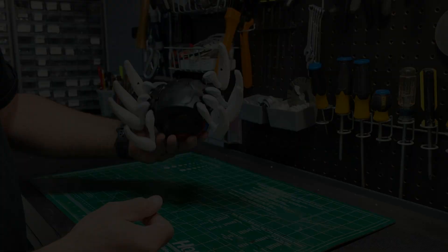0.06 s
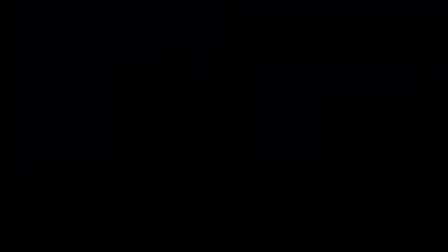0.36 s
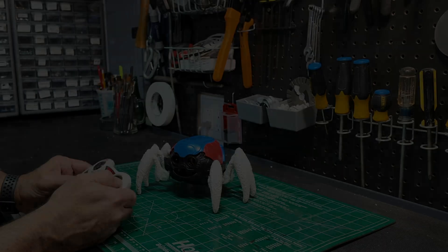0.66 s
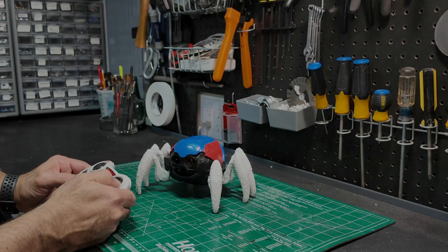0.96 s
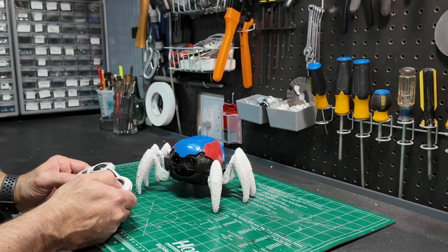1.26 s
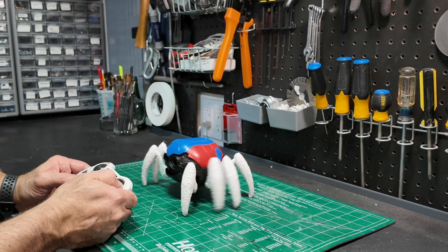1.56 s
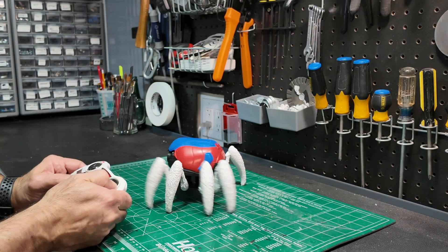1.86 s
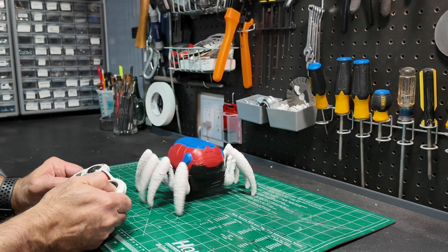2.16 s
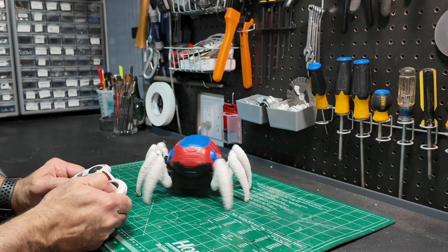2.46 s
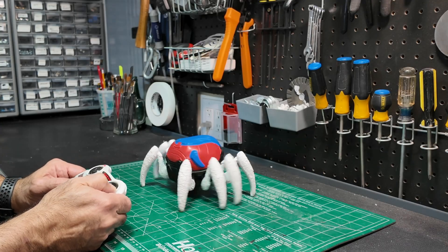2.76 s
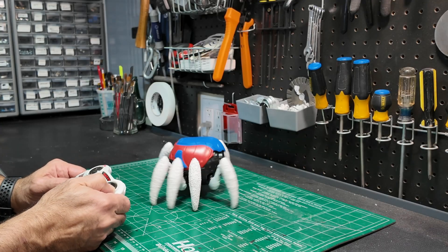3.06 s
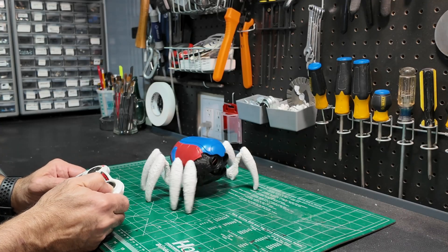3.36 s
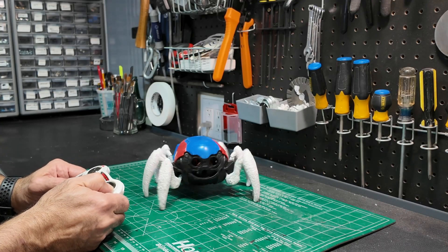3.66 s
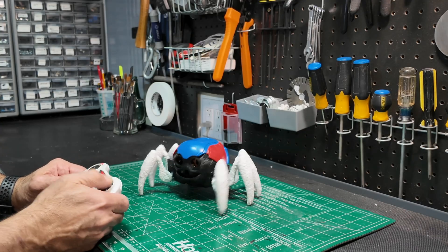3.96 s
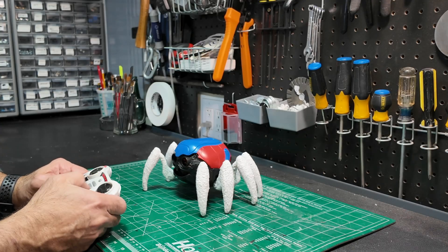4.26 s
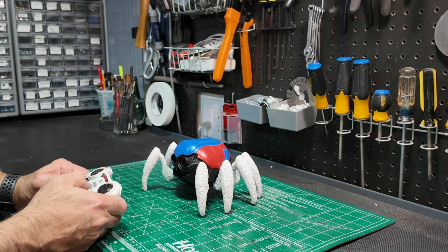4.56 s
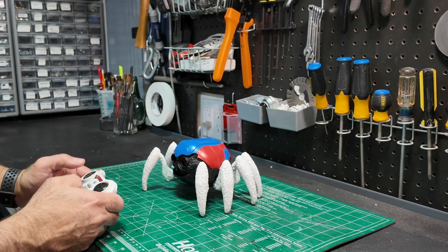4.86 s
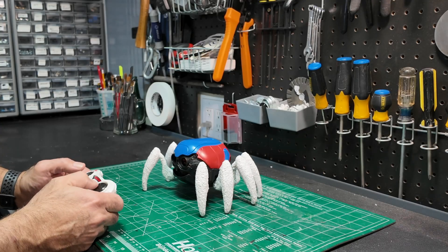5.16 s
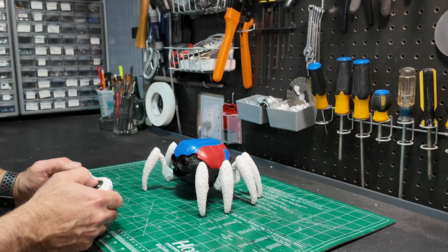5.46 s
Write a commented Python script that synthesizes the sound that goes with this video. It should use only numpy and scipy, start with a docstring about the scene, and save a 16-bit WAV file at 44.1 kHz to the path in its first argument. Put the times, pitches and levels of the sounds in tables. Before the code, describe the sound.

A remote-controlled toy's geared motor whines and its plastic legs clatter on a workbench, then stop, with faint button clicks before and after.

```python
"""A small workshop opens on quiet air and mains hum; buttons click on a controller.
At 1.4 s a remote-controlled toy spider starts turning on the spot on a workbench mat.
Its plastic gears whirr, chatter in the hollow shell and groan under each footfall; the legs clack,
the bench booms. Near 4.4 s the gears stop and the motor coasts to rest.
Last, the buttons click again and the hands shift on the bench."""
import sys
import numpy as np
from scipy import signal
from scipy.fft import rfft, irfft
from scipy.io import wavfile
from scipy.ndimage import uniform_filter1d

SR = 44100
rng = np.random.default_rng(int(sys.argv[2]) if len(sys.argv) > 2 else 0)


def int16_out(signal):
    """Quantize to a 16-bit WAV file."""
    q = np.round(np.clip(np.atleast_2d(signal).T, -1, 1) * 32767)
    wavfile.write(sys.argv[1], SR, q.astype(np.int16))


N = 248142
TIME_S = np.arange(N) / SR

# Spectral outlines. Each row: frequency in Hz, relative level in dB.
AIR_HZ_DB = [(15, -50), (25, -22.5), (55, -6.5), (122, -5.5), (188, -16.5), (253, -11), (340, -17.5),
             (666, -24), (1050, -27.5), (1340, -28), (1450, -34.5), (2170, -30.5), (4500, -37),
             (8580, -39.5), (15500, -45.5)]
BUTTON_BODY_HZ_DB = [(300, -27), (700, -11.5), (1020, 3.5), (1350, -2.5), (1700, -1), (2400, -2.5),
                     (4000, -49)]
BUTTON_RING_HZ_DB = [(1200, -27.5), (2150, -15.5), (2450, -4), (2850, 8.5), (3200, 4), (3700, -10),
                     (5000, -30)]
BUTTON_SNAP_HZ_DB = [(2000, -8), (3900, 4), (5000, 1.5), (6800, -2.5), (9000, -13), (15000, -27)]
TAP_HZ_DB = [(400, -33), (800, -10), (1080, 7.5), (1400, -8), (2800, -6), (6000, -30)]
WRIST_HZ_DB = [(100, -9), (220, -4), (400, 4), (600, -7), (800, -16), (1500, -40)]
RUB_HZ_DB = [(200, 5), (600, 5.5), (1100, -2), (1800, -1.5), (2800, -0.5), (4500, -7.5), (7000, -4.5),
             (10000, -14), (15000, -29)]
BUMP_HZ_DB = [(25, -24), (60, -13), (90, 10), (130, 1), (200, -16.5), (450, -25), (900, -67)]
THUD_HZ_DB = [(50, -27.5), (150, -7), (230, -10), (320, -0.5), (380, -7.5), (440, 1), (520, -4.5), (630, 0),
              (800, -7), (1100, -5), (1500, -11), (3000, -40.5)]
CLACK_HZ_DB = [(500, -12.5), (1100, -6.5), (1700, 1), (2100, 2.5), (2700, 5), (3600, 0), (4500, -5),
               (7000, -31)]
TICK_HZ_DB = [(2500, -24.5), (4700, -0.5), (6700, 0.5), (8200, -9), (10000, -11), (12500, -25.5),
              (15500, -34.5)]
SCUFF_HZ_DB = [(24, -46), (40, -16.5), (70, -2), (102, -10), (124, 5), (209, -8), (316, -2), (378, -0.5),
               (439, 2.5), (509, -4), (618, -4), (750, -3), (951, -6), (1060, -2.5), (1400, -16),
               (1820, -39.5), (3080, -120)]
CHATTER_HZ_DB = [(500, -22), (900, -12.5), (1400, -3), (1850, -2.5), (2500, 0.5), (3300, -6.5),
                 (4000, -5.5), (5000, -27.5)]
CLASH_HZ_DB = [(2290, -39.5), (3900, 1), (4510, 0.5), (5090, 5), (5740, 3), (6520, 5), (7400, -3.5),
               (8070, -10.5), (9540, -7.5), (10500, -16.5), (11500, -13.5), (13100, -31.5), (15500, -46)]

# Electrical tones. Each row: frequency in Hz, wander in Hz, level in dB.
HUM_TONES = [(120.3, 3, -66.5), (5850, 250, -91), (8440, 120, -89)]
# Button clicks. Each row: start in seconds, then body, ring and snap levels in relative dB.
BUTTON_CLICKS = [(0.605, -47.5, -53.5, -58), (0.76, -53.5, -64, -62), (1.141, -41, -43, -72),
                 (1.183, -45.5, -53.5, -54), (4.897, -52, -49.5, -57), (5.294, -46, -52.5, -47.5),
                 (5.301, -37.5, -48, -47), (5.312, -50, -54, -61), (5.613, -38.5, -30.5, -40.5)]
# Fingers on the case; wrist on the bench. Each row: start in seconds, level in dB.
FINGER_TAPS_S_DB = [(0.86, -64), (0.947, -65.5), (4.752, -65), (4.92, -59), (4.929, -56), (5.09, -63),
                    (5.53, -47)]
WRIST_KNOCKS_S_DB = [(0.779, -57), (0.792, -60), (0.804, -58)]
# Fingers sliding; hand bumping the bench. Each row: centre in seconds, half length in seconds,
# level in dB.
FINGER_RUBS = [(.89, 0.033, -70), (1.37, 0.028, -68), (4.945, 0.041, -66), (5.345, 0.043, -59.5),
               (5.53, 0.06, -54.5)]
HAND_BUMPS = [(.812, .012, -55), (5.518, 0.012, -34), (5.578, 0.027, -40.5)]

# Footfalls, about ten a second. Each row: start in seconds, then thud, clack, tick, bench boom and
# gear groan levels in relative dB, then groan lag in seconds.
FOOTFALLS = [(1.537, -27.5, -44, -38, -33, -33.5, 0.07), (1.649, -26.5, -24, -27.5, -40, -29.5, 0.04),
             (1.73, -29, -28.5, -35.5, -35.5, -35, 0.065), (1.851, -25.5, -36, -34, -37, -30, .059),
             (1.945, -27.5, -32, -28.5, -39.5, -31.5, .06), (2.063, -25, -27, -24.5, -35.5, -25, 0.058),
             (2.178, -29, -26.5, -41, -39.5, -30.5, 0.055), (2.274, -23, -23, -26.5, -34, -25.5, .054),
             (2.39, -24.5, -39.5, -29, -38.5, -31, 0.044), (2.474, -30.5, -29, -27, -40, -31.5, .056),
             (2.56, -29, -23.5, -33, -36.5, -36.5, 0.066), (2.688, -26.5, -32, -26, -43, -35.5, .06),
             (2.768, -33, -28.5, -32, -45.5, -38, 0.056), (2.885, -34.5, -36.5, -33, -42, -36, .035),
             (2.986, -29.5, -35, -26.5, -34.5, -35, .035), (3.097, -26, -26, -46, -47.5, -33.5, .032),
             (3.2, -29, -30.5, -27.5, -47.5, -30.5, 0.036), (3.291, -27, -27.5, -31.5, -53, -28, .051),
             (3.401, -28.5, -31, -29.5, -40.5, -30.5, 0.051), (3.505, -20, -24, -25.5, -44, -28, 0.051),
             (3.584, -27.5, -24.5, -34.5, -40, -28, 0.08), (3.712, -24, -23, -35, -37.5, -28, 0.04),
             (3.791, -28, -23.5, -37.5, -32.5, -29, 0.087), (3.92, -25.5, -25.5, -23, -32.5, -26, 0.035),
             (4.019, -32, -40, -40.5, -33.5, -32.5, .062), (4.125, -20.5, -24, -22, -38.5, -28.5, .02),
             (4.221, -35.5, -45.5, -44, -39.5, -46, .05)]
# Loose joints hitting their stops. Each row: start in seconds, then thud, clack and tick levels
# in relative dB.
JOINT_KNOCKS = [(1.513, -34.5, -27.5, -47), (1.694, -25, -21.5, -26.5), (2.149, -27, -24, -31),
                (2.353, -29, -23.5, -32), (2.508, -31, -32, -33), (2.782, -28.5, -28.5, -27),
                (2.937, -27.5, -33.5, -34), (3.007, -33, -29.5, -30), (3.298, -28.5, -24.5, -30.5),
                (3.43, -35.5, -25.5, -43), (3.628, -29.5, -33.5, -32.5), (3.839, -31, -29.5, -33.5),
                (3.954, -24, -19, -25), (4.146, -42.5, -21.5, -29.5), (4.159, -28.5, -21, -22.5)]
# Dry joints squeaking; gears taking up slack on start and braking. Each row: centre in seconds,
# half length in seconds, pitch in Hz, relative level in dB.
JOINT_SQUEAKS = [(2.064, 0.0061, 10300, -45), (2.135, 0.019, 13900, -58), (2.53, 0.014, 3530, -35.5),
                 (2.77, .018, 7150, -38), (3.118, 0.014, 2290, -31), (3.405, .01, 13060, -59),
                 (3.61, 0.0091, 9860, -40.5), (3.83, .025, 5560, -34), (3.9, 0.047, 5120, -37),
                 (3.96, 0.013, 4730, -36.5)]
SLACK_JOLTS = [(1.443, 0.011, 2484, -32), (4.31, .025, 2415, -38)]

# Freewheeling rotor. Each row: time in seconds, whistle pitch in Hz, relative level in dB.
ROTOR_S_HZ_DB = [(4.42, 8150, -80), (4.45, 8200, -73), (4.49, 7570, -70), (4.53, 7100, -75),
                 (4.58, 6020, -79.5), (4.62, 4960, -84)]
# Gear pairs; the slow one drives the legs. Each row: time in seconds, tooth rate in Hz,
# relative level in dB.
FIRST_MESH_S_HZ_DB = [(1.41, 1500, -60), (1.5, 2010, -38), (1.8, 2167, -38.5), (1.95, 2210, -33),
                      (2.2, 2253, -36), (2.7, 2242, -47), (3.1, 2259, -45), (3.7, 2264, -41.5),
                      (4.15, 2197, -44.5), (4.3, 1650, -50), (4.37, 1455, -37), (4.43, 1300, -66)]
SECOND_MESH_S_HZ_DB = [(1.5, 2610, -55.5), (1.7, 2990, -44), (1.92, 3113, -38), (2.08, 3290, -34),
                       (2.3, 3283, -37.5), (2.55, 3490, -45.5), (2.7, 3360, -46.5)]
SLOW_MESH_S_HZ_DB = [(1.85, 1633, -55), (2.0, 1657, -41.5), (2.25, 1654, -36), (2.55, 1662, -40),
                     (2.8, 1650, -59), (3.2, 1660, -43), (3.6, 1672, -40.5), (3.95, 1670, -40.5),
                     (4.1, 1645, -49)]
# Plastic shell resonances. Each row: centre in Hz, width in Hz, relative level in dB.
SHELL_MODES = [(1440, 250, -12.5), (1648, 78, -3.5), (2140, 300, -12), (2170, 140, -8.5), (2478, 130, -2.5),
               (2750, 94, -1.5), (3130, 380, -3), (3700, 220, -9.5)]
# Chatter at full speed. Each row: time in seconds, relative level in dB.
CHATTER_S_DB = [(1.5, -28.5), (2.25, -28), (2.7, -29.5), (3.2, -29.5), (3.6, -28.5), (4.3, -29.5)]

OPEN_S, TOP_HZ = 0.357, 15700
MOTOR_ON_S, GEARS_LOCK_S, FULL_SPEED_HZ = 1.421, 4.362, 2273
CHATTER_DB_PER_OCTAVE, CLASH_DB_PER_OCTAVE = 9, 23
LOAD_ATTACK_S, LOAD_HOLD_S, LOAD_RELEASE_S = 0.015, 0.05, 0.014
GROAN_HALF_S, GROAN_RATIO, GROAN_SCATTER = 0.019, 1.106, 0.012


def undb(db):
    """Decibels to gain."""
    return 10 ** (np.asarray(db) / 20)


def unit(x):
    """Scale to rms 1."""
    return x / np.sqrt(np.mean(x ** 2))


def phase_rad(hz):
    """Running phase of a varying frequency."""
    return 2 * np.pi * np.cumsum(hz) / SR


def curve(table, column):
    """Table column, linear in time between rows."""
    rows = np.array(table)
    return np.interp(TIME_S, rows[:, 0], rows[:, column])


def gate(start_s, end_s, rise_s, fall_s):
    """Gain 1 from start to end, exponential skirts outside."""
    return np.exp(-np.maximum(start_s - TIME_S, 0) / rise_s - np.maximum(TIME_S - end_s, 0) / fall_s)


def swell(table, rise_s=0.014, fall_s=0.097):
    """Gain from (s, Hz, dB) rows, fading outside their span."""
    return undb(curve(table, 2)) * gate(table[0][0], table[-1][0], rise_s, fall_s)


def strokes(table):
    """One Gaussian gain pulse per row."""
    return sum(undb(db) * np.exp(-((TIME_S - s) / half_s) ** 2 / 2) for s, half_s, db in table)


def colour(x, outline):
    """Minimum-phase filter with a (Hz, dB) outline."""
    hz, db = np.transpose(outline)
    grid_hz = np.maximum(np.fft.rfftfreq(4096, 1 / SR), 1)
    cepstrum = irfft(np.log(undb(np.interp(np.log(grid_hz), np.log(hz), db))))
    half = len(cepstrum) // 2
    cepstrum[1:half] *= 2
    cepstrum[half + 1:] = 0
    return signal.fftconvolve(x, irfft(np.exp(rfft(cepstrum))))[:len(x)]


def ring(x, hz, width_hz):
    """One resonance, gain 1 at centre."""
    return signal.lfilter(*signal.iirpeak(hz, hz / width_hz, fs=SR), x)


def wander(rate_hz):
    """Smooth random drift, rms 1."""
    hold = int(SR / rate_hz)
    stairs = np.repeat(rng.standard_normal(N // hold + 1), hold)
    return unit(uniform_filter1d(stairs, hold)[:N])


def grains(rate_hz, spread_db):
    """Random tiny impacts of uneven strength."""
    impulses = (rng.random(N) < rate_hz / SR) * rng.choice([-1, 1], N)
    return unit(impulses * undb(spread_db * rng.standard_normal(N)))


def blows(table, column, outline, crack_s, bounce_db, bounce_s):
    """Per row: a brief crack, then a dying patter of rebounds."""
    out, age_s = np.zeros(N + SR), TIME_S[:SR // 4]
    for row in table:
        noise = rng.standard_normal((3, len(age_s)))
        crack = noise[0] * np.exp(-age_s / crack_s)
        rebounds = undb(bounce_db) * unit(noise[1] * noise[2] ** 2) * np.exp(-age_s / bounce_s)
        hit = colour(crack + rebounds, outline)
        peak_rms = np.sqrt(uniform_filter1d(hit ** 2, SR // 250).max())
        start = int(row[0] * SR)
        out[start:start + len(age_s)] += hit * undb(row[column]) / peak_rms
    return out[:N]


def whine(hz, jitter, flutter_db, overtone_db):
    """Tone of a spinning part; loose axles shake pitch and level."""
    phase = phase_rad(hz * (1 + jitter * wander(500)))
    tone = np.sin(phase) + undb(overtone_db) * np.sin(2 * phase)
    return unit(tone * undb(flutter_db * wander(280)))


def sagging_tones(table, sag, jitter, flutter_db, overtone_db):
    """Short rough tones; pitch drops under load, then settles."""
    out = np.zeros(N)
    wobble = 1 + jitter * wander(800)
    flutter = unit(undb(flutter_db * np.tanh(wander(450))))
    for centre_s, half_s, hz, db in table:
        span = np.abs(TIME_S - centre_s) < 3 * half_s
        offset = (TIME_S[span] - centre_s) / half_s
        droop = 1 + sag * (np.exp(-np.maximum(offset, -2)) - 1)
        phase = phase_rad(hz * droop * wobble[span])
        tone = np.sin(phase) + undb(overtone_db) * np.sin(2 * phase) * (hz < SR / 5)
        out[span] += undb(db) * np.sqrt(2) * tone * flutter[span] * np.exp(-offset ** 2 / 2)
    return out


def workshop():
    """Quiet air, mains hum, faint electrical whistle."""
    air = unit(colour(rng.standard_normal(N), AIR_HZ_DB)) * undb(-64 + wander(1.9))
    hum = sum(undb(db) * np.sqrt(2) * np.sin(phase_rad(hz + drift_hz * wander(10 * drift_hz)))
              for hz, drift_hz, db in HUM_TONES)
    return air + hum


def wall_reflections(x, t60_s, wet_db):
    """Short, dull reverberation off crowded walls."""
    age_s = TIME_S[:SR // 2]
    tail = rng.standard_normal(len(age_s)) * undb(-60 * age_s / t60_s) * (age_s > 0.005)
    tail = colour(tail, [(100, -1.5), (1000, 4.0), (3000, -1.0), (8000, -1.5), (15000, -6.5)])
    return undb(wet_db) * signal.fftconvolve(x, tail / np.linalg.norm(tail))[:N]


def hanging_tools(x, hz, width_hz, t60_s, wet_db):
    """Steel tools on the wall ring in sympathy."""
    band = ring(ring(rng.standard_normal(SR), hz, width_hz), hz, width_hz)
    tail = band * undb(-60 * TIME_S[:SR] / t60_s)
    return undb(wet_db) * signal.fftconvolve(x, tail / np.linalg.norm(tail))[:N]


def buttons():
    """Buttons snap in the controller's hollow case."""
    body = blows(BUTTON_CLICKS, 1, BUTTON_BODY_HZ_DB, crack_s=0.0046, bounce_db=-29, bounce_s=0.0085)
    case = blows(BUTTON_CLICKS, 2, BUTTON_RING_HZ_DB, crack_s=0.0042, bounce_db=-12.5, bounce_s=0.011)
    snap = blows(BUTTON_CLICKS, 3, BUTTON_SNAP_HZ_DB, crack_s=0.003, bounce_db=-4, bounce_s=0.011)
    return undb(-3) * body + undb(-0.5) * case + undb(-2) * snap


def hands():
    """Fingers tap and rub the case; wrist and hand knock the bench."""
    taps = blows(FINGER_TAPS_S_DB, 1, TAP_HZ_DB, crack_s=0.0049, bounce_db=-15, bounce_s=0.015)
    wrist = blows(WRIST_KNOCKS_S_DB, 1, WRIST_HZ_DB, crack_s=0.0086, bounce_db=-5, bounce_s=0.016)
    rubs = unit(colour(grains(rate_hz=6600, spread_db=3.5), RUB_HZ_DB)) * strokes(FINGER_RUBS)
    bumps = unit(colour(rng.standard_normal(N), BUMP_HZ_DB)) * strokes(HAND_BUMPS)
    return taps + wrist + rubs + bumps


def coasting_rotor():
    """The freed rotor whistles down to rest; a brief partial sits above."""
    hz, start_s = curve(ROTOR_S_HZ_DB, 1), ROTOR_S_HZ_DB[0][0]
    upper = whine(1.58 * hz, jitter=0.005, flutter_db=4, overtone_db=-80)
    upper *= gate(start_s, start_s, rise_s=0.02, fall_s=0.05)
    whistle = whine(hz, jitter=0.008, flutter_db=3, overtone_db=-36.5)
    return (undb(-1) * whistle + undb(-7) * upper) * swell(ROTOR_S_HZ_DB, fall_s=0.015)


def foot_load():
    """Push on the bench: each foot takes the weight, holds, lets go."""
    load = np.zeros(N)
    for start_s, _, _, _, boom_db, _, _ in FOOTFALLS:
        attack = np.clip((TIME_S - start_s) / LOAD_ATTACK_S, 0, 1)
        lift_s = start_s + LOAD_ATTACK_S + LOAD_HOLD_S
        load += undb(boom_db) * attack * gate(start_s, lift_s, LOAD_ATTACK_S, LOAD_RELEASE_S)
    return load


def foot_scuff(load):
    """Feet drag on the mat throughout the walk, harder under load."""
    walking = gate(FOOTFALLS[0][0], FOOTFALLS[-1][0], rise_s=0.035, fall_s=0.12)
    friction = unit(colour(grains(rate_hz=1200, spread_db=0.5), SCUFF_HZ_DB))
    return friction * np.hypot(undb(-39.5) * walking, undb(-4.5) * load)


def bench_boom(load):
    """The bench top booms under each foot."""
    mode_hz = 120 * (1 + 0.0508 * wander(35))
    return undb(-2.5) * unit(np.sin(phase_rad(mode_hz)) * undb(2 * wander(45))) * load


def legs():
    """Feet thud on the mat; joints clack, tick and squeak."""
    hits = list(FOOTFALLS) + list(JOINT_KNOCKS)
    thuds = blows(hits, 1, THUD_HZ_DB, crack_s=0.004, bounce_db=-8, bounce_s=0.029)
    clacks = blows(hits, 2, CLACK_HZ_DB, crack_s=0.00089, bounce_db=-10, bounce_s=0.02)
    ticks = blows(hits, 3, TICK_HZ_DB, crack_s=0.0047, bounce_db=-3.5, bounce_s=0.01)
    squeaks = sagging_tones(JOINT_SQUEAKS, sag=0.008, jitter=0.028, flutter_db=10.5, overtone_db=-31.5)
    return undb(1.75) * thuds + undb(1.5) * clacks + undb(0.2) * ticks + undb(0.5) * squeaks


def gear_groan(mesh_hz):
    """Gears groan as each leg lifts the body, and on start and braking."""
    ratios = GROAN_RATIO * (1 + GROAN_SCATTER * rng.standard_normal(len(FOOTFALLS)))
    lifts = [(s + lag_s, GROAN_HALF_S, ratio * np.interp(s + lag_s, TIME_S, mesh_hz), db)
             for (s, *_, db, lag_s), ratio in zip(FOOTFALLS, ratios)]
    groans = lifts + list(SLACK_JOLTS)
    return undb(-0.5) * sagging_tones(groans, sag=0.02, jitter=0.026, flutter_db=4, overtone_db=-12.5)


def shifting_contacts(x, depth_db, step_hz=450):
    """Tooth contact points move, so each band swells on its own."""
    hz, spectrum = np.fft.rfftfreq(N, 1 / SR), rfft(x)
    bands = (irfft(spectrum * np.maximum(1 - np.abs(hz - centre_hz) / step_hz, 0), N)
             for centre_hz in np.arange(0, TOP_HZ + step_hz, step_hz))
    return unit(sum(band * undb(depth_db * wander(21.996)) for band in bands))


def gear_rattle(mesh_hz):
    """Teeth rattle in their backlash and ring the shell; faster is louder."""
    runout = 1 + 0.07 * np.sin(phase_rad(mesh_hz / 8))  # off-centre pinion: harder once a turn
    knocks = grains(rate_hz=3200, spread_db=4) * runout
    shell = unit(sum((-1) ** k * undb(db) * ring(knocks, hz, width_hz)
                     for k, (hz, width_hz, db) in enumerate(SHELL_MODES)))
    patter = unit(colour(grains(rate_hz=4000, spread_db=3) * runout, CHATTER_HZ_DB))
    chatter = undb(-6.5) * shell + undb(-6) * patter
    hiss = 1.6 * rng.standard_normal(N) * runout
    clash = shifting_contacts(colour(knocks + hiss, CLASH_HZ_DB), depth_db=2)
    speed_octaves = np.log2(mesh_hz / FULL_SPEED_HZ)
    chatter *= undb(curve(CHATTER_S_DB, 1) + CHATTER_DB_PER_OCTAVE * speed_octaves)
    chatter *= gate(MOTOR_ON_S, GEARS_LOCK_S, rise_s=0.0032, fall_s=0.037)
    clash *= undb(-32 + CLASH_DB_PER_OCTAVE * speed_octaves)
    clash *= gate(MOTOR_ON_S, GEARS_LOCK_S, rise_s=0.0027, fall_s=0.037)
    return chatter + clash


def gear_whine(mesh_hz):
    """Three gear pairs, each whining at its tooth rate."""
    first = whine(mesh_hz, jitter=0.024, flutter_db=6, overtone_db=-10.5)
    second = whine(curve(SECOND_MESH_S_HZ_DB, 1), jitter=0.01, flutter_db=4.5, overtone_db=-12.5)
    slow = whine(curve(SLOW_MESH_S_HZ_DB, 1), jitter=0.026, flutter_db=1.5, overtone_db=-10)
    return (undb(-2.5) * first * swell(FIRST_MESH_S_HZ_DB, rise_s=0.0033)
            + undb(-2) * second * swell(SECOND_MESH_S_HZ_DB)
            + undb(-3) * slow * swell(SLOW_MESH_S_HZ_DB))


def scene():
    """Toy and hands in the workshop, mono."""
    mesh_hz, load = curve(FIRST_MESH_S_HZ_DB, 1), foot_load()
    gears = gear_whine(mesh_hz) + gear_rattle(mesh_hz) + gear_groan(mesh_hz)
    steps = legs() + foot_scuff(load) + bench_boom(load)
    direct = gears + steps + coasting_rotor() + buttons() + hands()
    walls = wall_reflections(direct, t60_s=0.22, wet_db=-15)
    tools = hanging_tools(direct, hz=2750, width_hz=400, t60_s=0.62, wet_db=-29)
    return (direct + walls + tools + workshop())[None]


def record(dry):
    """Silence until OPEN_S; steep low-pass at TOP_HZ."""
    fade_in = np.clip((TIME_S - OPEN_S) / 0.0033, 0, 1)
    lowpass = signal.ellip(12, 0.1, 80, TOP_HZ, fs=SR, output="sos")
    return signal.sosfilt(lowpass, dry * fade_in)


dry = scene()
out = record(dry)
int16_out(out)
```